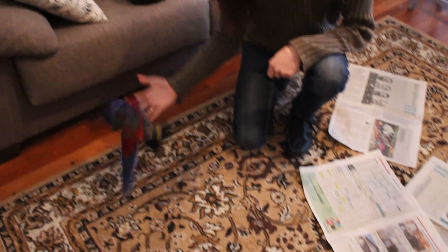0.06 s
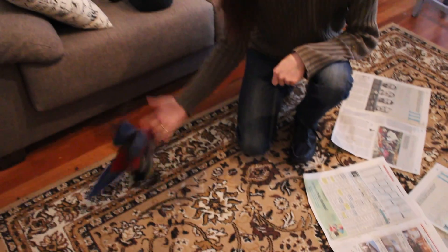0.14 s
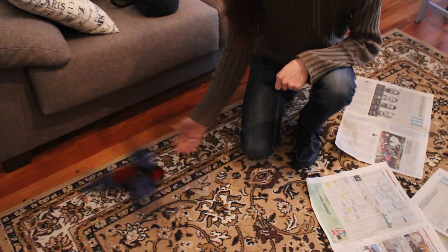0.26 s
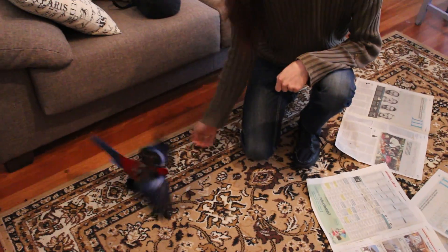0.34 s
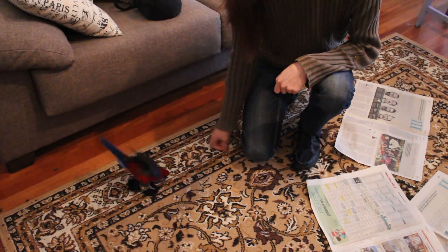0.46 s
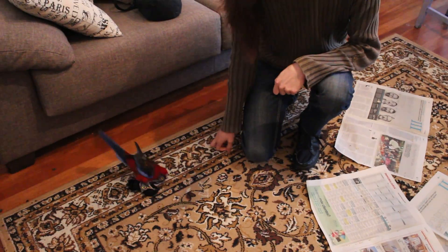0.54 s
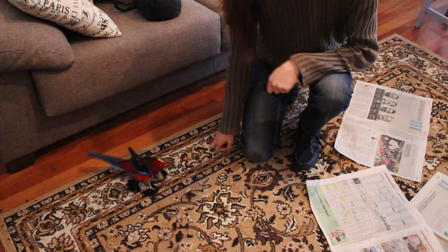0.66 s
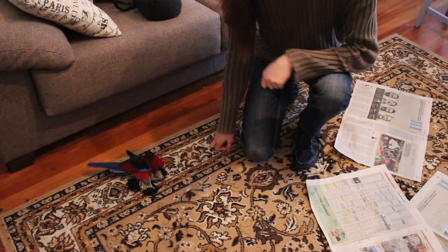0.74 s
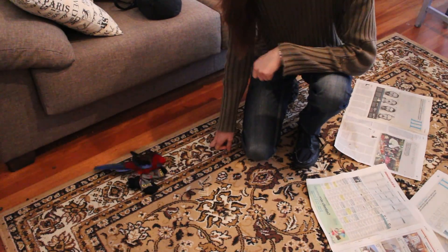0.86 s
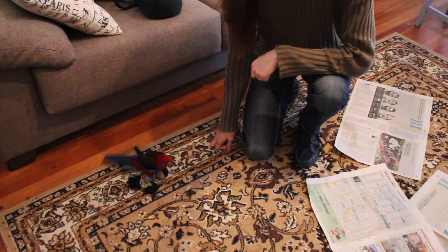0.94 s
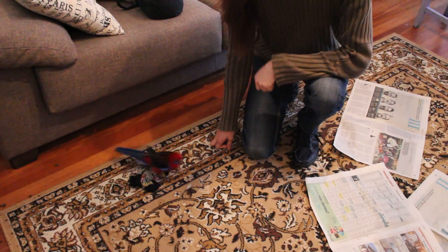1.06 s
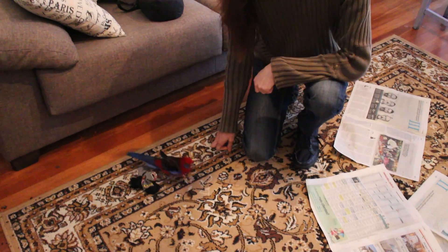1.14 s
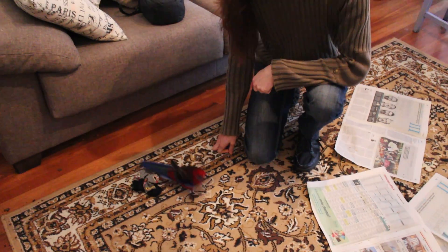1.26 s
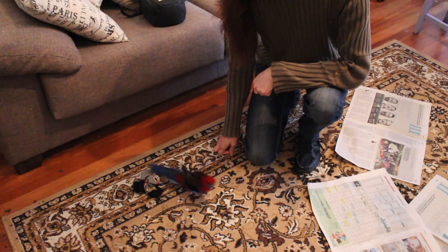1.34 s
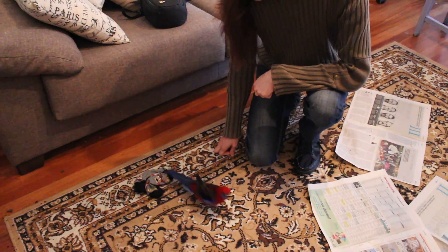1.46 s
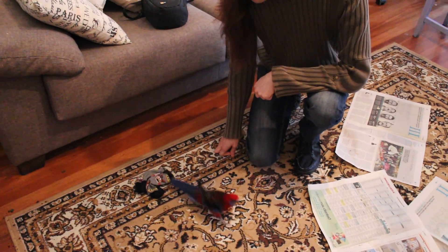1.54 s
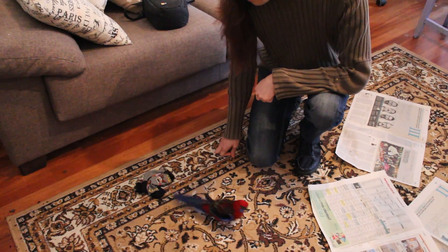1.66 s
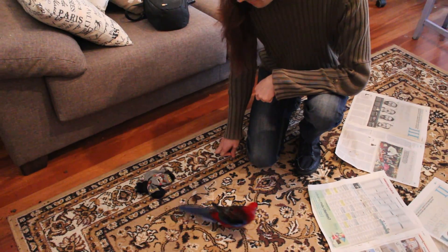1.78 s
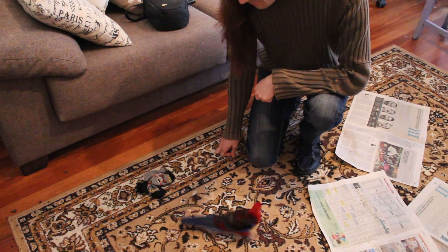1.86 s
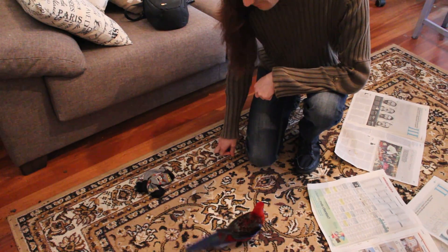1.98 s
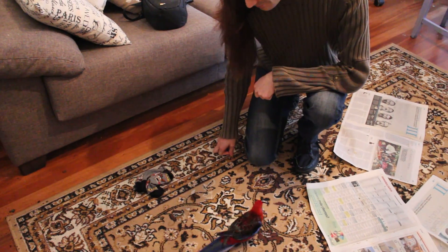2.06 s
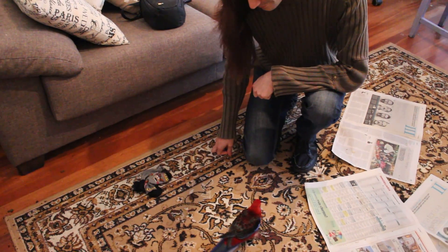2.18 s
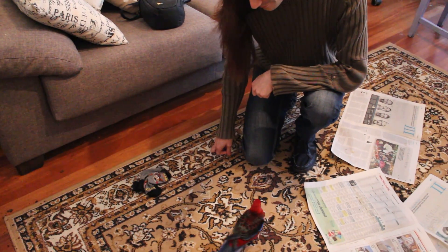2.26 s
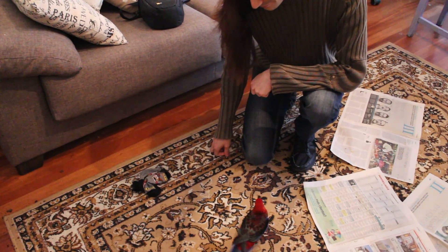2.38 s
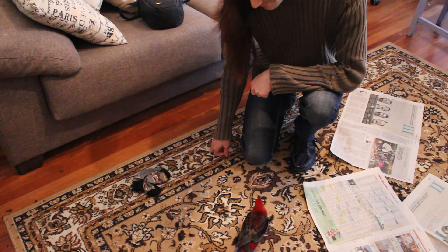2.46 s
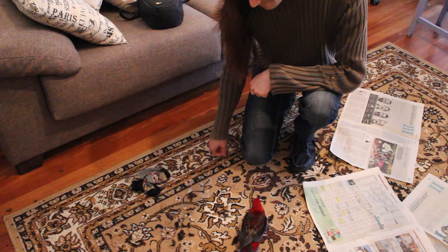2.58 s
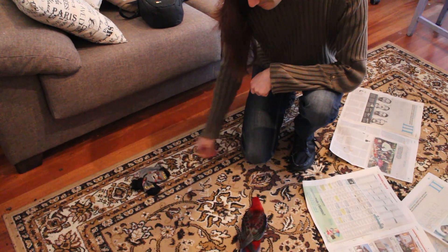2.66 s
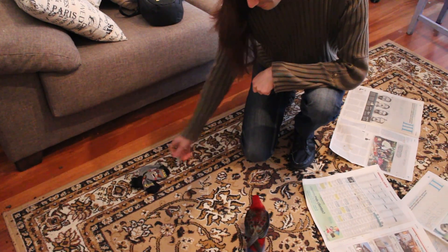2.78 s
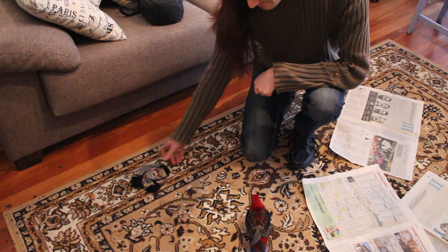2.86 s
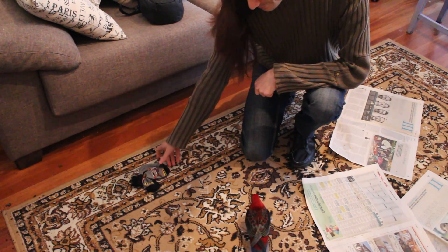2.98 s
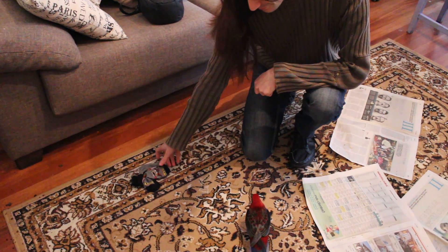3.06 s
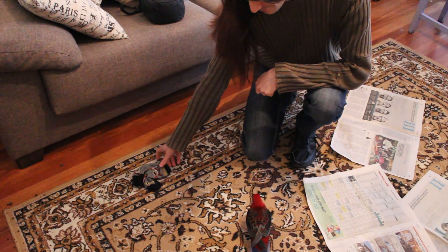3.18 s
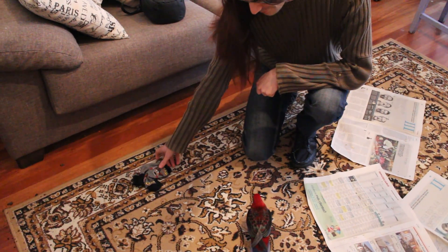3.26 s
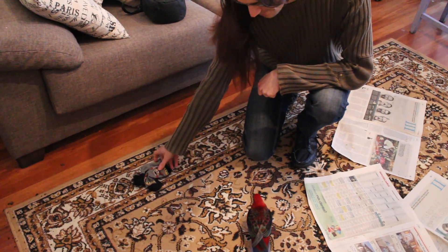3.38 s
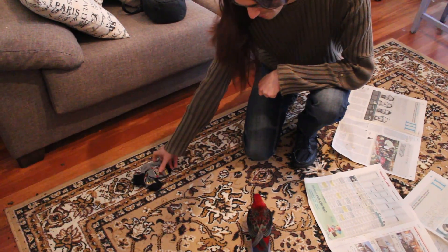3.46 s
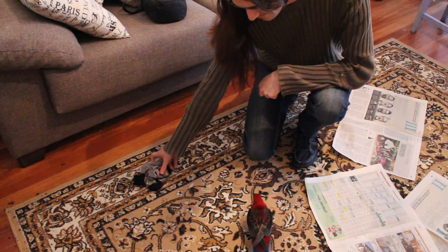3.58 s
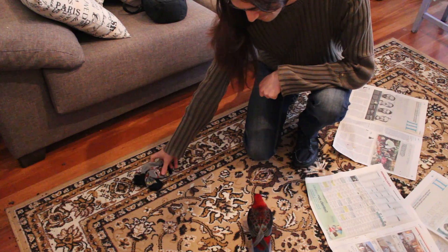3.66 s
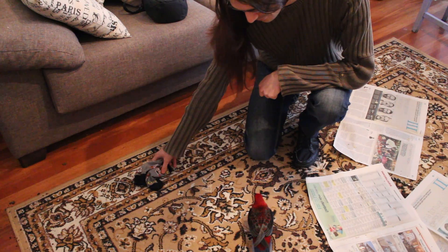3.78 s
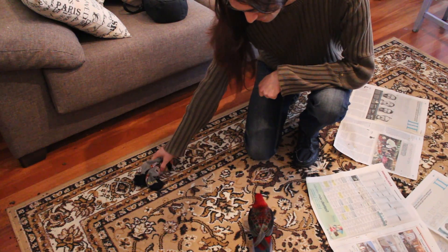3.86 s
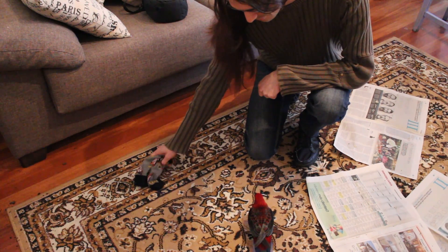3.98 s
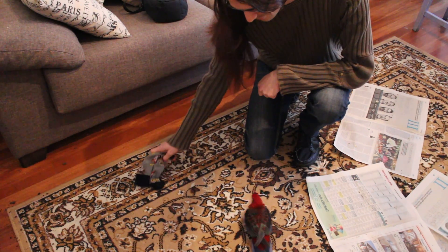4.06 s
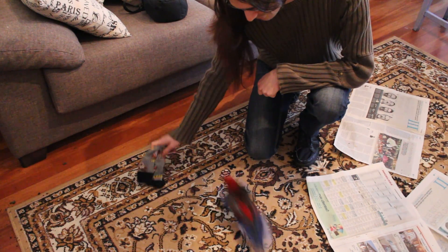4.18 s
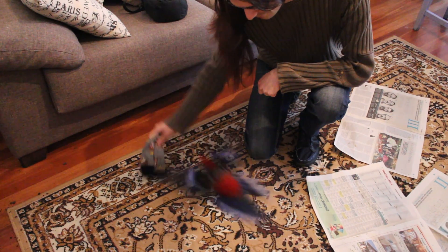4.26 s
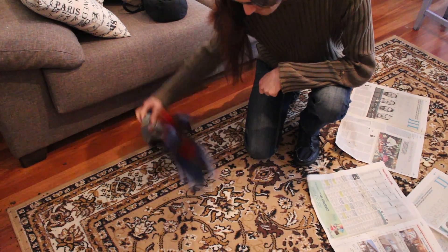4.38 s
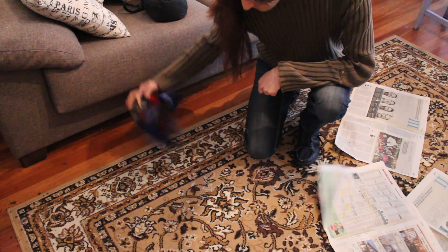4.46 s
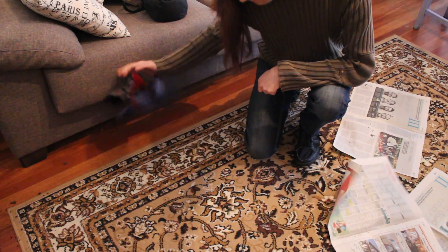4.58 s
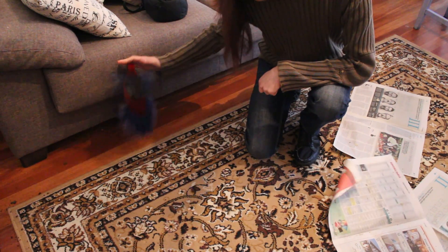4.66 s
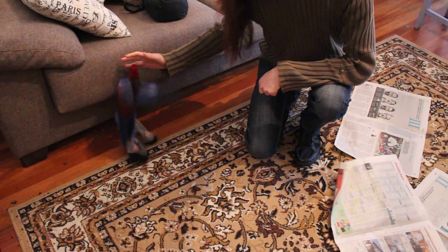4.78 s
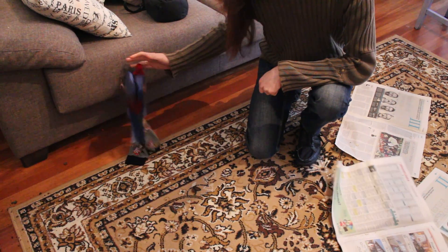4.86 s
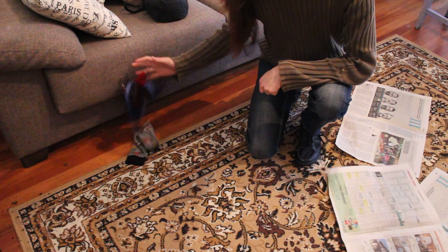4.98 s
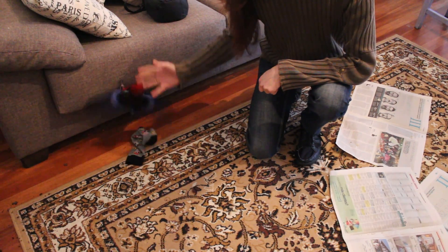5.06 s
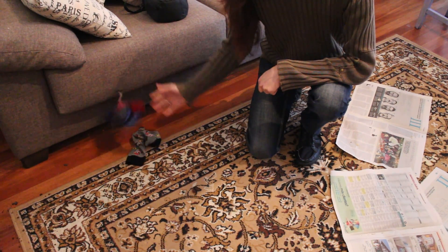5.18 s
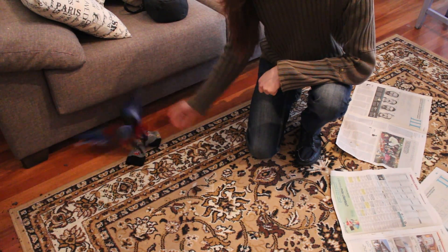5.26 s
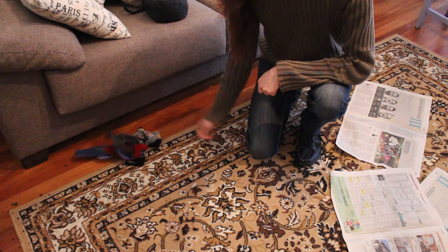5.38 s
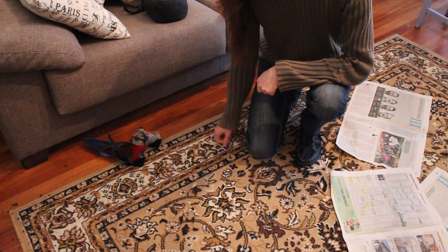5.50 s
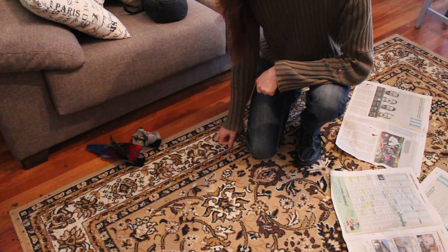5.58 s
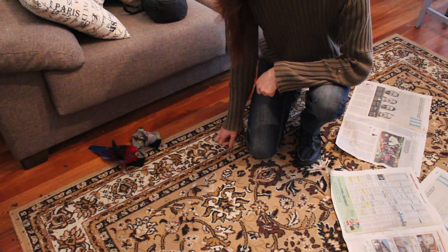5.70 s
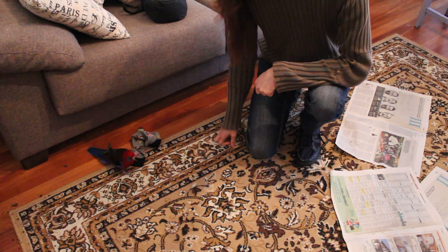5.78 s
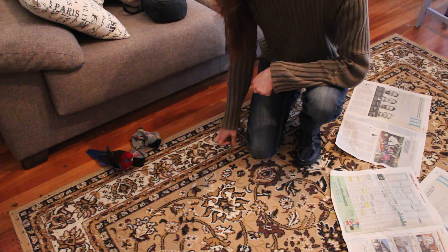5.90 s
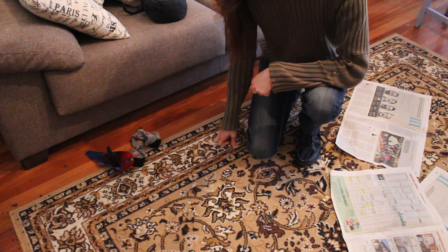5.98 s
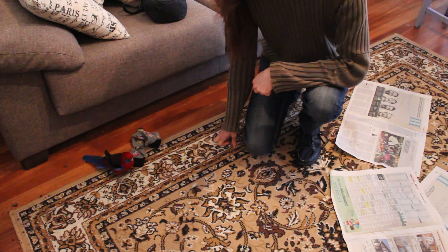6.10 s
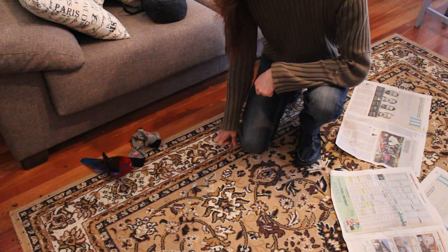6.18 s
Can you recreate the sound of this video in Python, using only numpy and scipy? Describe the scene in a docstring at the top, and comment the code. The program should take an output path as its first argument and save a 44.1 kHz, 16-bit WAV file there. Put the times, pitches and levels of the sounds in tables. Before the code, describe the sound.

A small parrot on a rug in a lively wood-floored room. A soft wing flurry and bumps open, then three very short, falling chirps about a second apart, each trailed by faint rasp. After a pause, wings burst and a loud, shrill, surging screech rings through the room. Claw ticks, sleeve scrapes and another flutter lead to two brighter chirps. Stereo microphone a short distance away, low dull hush behind.

```python
"""A wing flurry over a low hush comes first, then a parrot on a living-room rug guards a small object.
Main source: five sharp falling chirps, summed partials in throat resonances, each trailed by a noise rasp;
one shrill screech as it flies at a hand, a surging sine with overtones.
Wings are grainy noise with puffs; claw ticks, sleeve scrapes and soft floor bumps are resonated noise.
Discrete reflections and a decaying tail make a lively room; filtered noise makes the hush."""
import sys
import numpy as np
from scipy import signal
from scipy.fft import rfft, irfft, next_fast_len
from scipy.io import wavfile

SR = 44100
rng = np.random.default_rng(int(sys.argv[2]) if len(sys.argv) > 2 else 0)


def wav_out(sig):
    """Save sig, one row per channel (or a flat mono array), as 16-bit PCM at SR to the path in sys.argv[1]."""
    wavfile.write(sys.argv[1], SR, np.round(np.clip(np.atleast_2d(sig).T, -1, 1) * 32767).astype(np.int16))


N = 274937
TIME_S = np.arange(N) / SR
TOP_HZ = 15750
LN_60_DB = np.log(1000)

# Source levels are ahead of the mix gains in scene(); spectra are relative.
# chirps: (time [s], length [s], starting pitch [Hz], depth of fall [0-1], level [dB],
#          brightness [dB/octave], closing croak [dB], after-rasp level [dB])
CHIRPS = [(1.131, 0.05, 1780, 0.94, -29, 0, -6.5, -43.5), (2.214, 0.045, 1780, 0.98, -31.5, -2, -5, -50),
          (3.168, .046, 1750, 0.96, -33.5, -3.5, -4.5, -47.5), (5.193, .044, 1790, .7, -28.5, -1, -8, -45),
          (5.574, .047, 1830, .85, -33, 1, 6.5, -45.5)]
# throat and beak resonances: (frequency [Hz], level [dB])
THROAT_SPECTRUM = [(500, -3), (1000, -4.5), (1500, -1), (1850, -2.5), (2400, -9), (3400, -8.5),
                   (4200, -9.5), (4800, -4), (6500, -24), (8300, -21), (10000, -29.5), (11500, -22),
                   (15000, -54)]
# breathy rasp trailing a chirp: (frequency [Hz], level [dB])
RASP_SPECTRUM = [(250, 0), (600, 4), (1500, -3), (2500, -7), (4200, -18), (5700, -7.5), (7500, -24),
                 (11500, -26.5), (16000, -38)]
# chirp pitch: steady slide, then drop at the break (shares of starting pitch, ahead of the fall exponent)
CHIRP_SLIDE, CHIRP_DROP = .28, .4
# end of attack, centre and width of the break (shares of chirp length)
CHIRP_ATTACK, CHIRP_BREAK, BREAK_WIDTH = 0.16, .78, 0.0694

# screech overtones, level drifting steadily: (multiple of pitch [1], starting level [dB], rise [dB/s])
OVERTONES = [(2, -61, 11.5), (3, -53.5, 27), (4, -54.5, -12.5), (5, -69, 7.5), (6, -71, 0)]
# screech surges: (time [s], length [s], level [dB], left minus right [dB])
SURGES = [(4.489, 0.024, -17.5, 7), (4.508, 0.028, -18.5, 4.5), (4.569, 0.041, -17.5, 5),
          (4.618, 0.03, -21.5, -1), (4.666, 0.16, -24, 14.5)]
SURGE_ATTACK_S, SURGE_RELEASE_S = .012, 0.014
# held note under the surges; pitch starts flat and settles upward
SCREECH_START_S, SCREECH_LENGTH_S, SCREECH_DB = 4.456, 0.372, -33
SCREECH_HZ, SCREECH_FLAT_HZ, SETTLE_S = 2457, 90.1, .1
# room ringing at the whistle's pitch: gain, decay, left minus right
RING_DB, RING_T60_S, RING_PAN_DB = -6.5, 0.49, -6.5

# flapping: (time [s], run-up time constant [s], length [s], rustle level [dB], treble re rustle [dB],
#            air per beat [dB], swish per beat [dB])
FLURRIES = [(0, .02, 0.34, -51.5, -5, -51.5, -56.5), (4.404, 0.082, 0.42, -44.5, -4, -43.5, -63.5),
            (5.058, 0.028, 0.27, -44.5, -8, -50.5, -62)]
# hard wing slaps on rug and sleeve: (time [s], length [s], air level [dB], swish level [dB])
SLAPS = [(.36, 0.055, -49.5, -55.5), (4.413, 0.037, -35.5, -39), (4.744, 0.051, -32.5, -35)]
WINGBEAT_HZ, WINGBEAT_S, RUSTLE_RELEASE_S = 14.42, 0.054, 0.11
# soft feather rustle: (frequency [Hz], level [dB])
FEATHER_SPECTRUM = [(60, -6), (150, -1), (350, -0.5), (900, -2), (1700, -2), (3000, -8), (5000, -17),
                    (9000, -31)]
# crisp quill noise: (frequency [Hz], level [dB])
QUILL_SPECTRUM = [(1500, 2), (3500, 1.5), (6000, -0.5), (10000, -6), (13000, -15.5), (15500, -32.5)]
# air pushed by the wings: (frequency [Hz], level [dB])
AIR_SPECTRUM = [(25, -2), (70, -5.5), (130, 0), (200, 0), (450, -1.5), (1000, -6), (2000, -10.5),
                (5000, -33.5)]

# ticks of claws, beak and quills: (time [s], level [dB], centre [Hz])
TICKS = [(.28, -51, 8200), (.288, -45.5, 7500), (4.414, -35, 3980), (5.022, -40, 1494), (5.045, -33.5, 950),
         (5.073, -37, 1094), (5.112, -26.5, 1300), (5.173, -25, 1640)]
# bumps and scuffs on rug-covered boards: (time [s], length [s], level [dB], centre [Hz])
BUMPS = [(.145, 0.2, -51.5, 360), (.17, 0.16, -55.5, 45.4), (1.28, 0.06, -49.5, 355),
         (2.665, 0.093, -51.5, 299.6), (4.372, .04, -43.5, 453), (5.29, 0.074, -45, 498),
         (5.35, 0.11, -46, 248), (5.68, 0.081, -48, 600), (5.98, 0.056, -47.5, 310)]
# feathers scraping the sleeve: (time [s], length [s], level [dB], centre [Hz])
SCRAPES = [(0, 0.051, -45.5, 2380), (.36, 0.059, -58, 9000), (4.16, 0.4, -64.5, 5470),
           (4.525, 0.1, -48, 3660), (5.11, 0.1, -46, 855), (5.225, 0.058, -42, 1070)]

# echoes off floor and nearest walls: (delay [s], level [dB], left minus right [dB])
REFLECTIONS = [(.0045, -24.5, 3), (.0115, -5.5, -6.5), (0.023, -21, -0.5), (.036, -8, -3), (.058, -11, 1.5)]
# reverberation: (frequency [Hz], t60 [s])
ROOM_T60 = [(150, 0.56), (600, 0.46), (2000, 0.48), (5000, 0.5), (14000, 0.13)]
# spread of diffuse sound: (frequency [Hz], side minus mid [dB], right minus left [dB])
STEREO = [(40, -19.5, 4.5), (248, -7, 4.5), (1000, -6, 3.5), (2500, -1, 1), (5000, -0.5, 0.5),
          (10000, 0.5, 0)]

# room tone: (frequency [Hz], density [dB per Hz])
FLOOR_SPECTRUM = [(20, -13.5), (40, 5), (62, -5), (100, -6.5), (160, 1), (300, -4.5), (400, -8.5),
                  (900, -13.5), (2000, -18.5), (5500, -22), (10000, -27), (15700, -33.5)]
FLOOR_DB = -55.5
# hush, sinking and returning: (time [s], level [dB])
HUSH_LEVEL = [(0, -49.5), (1.6, -47.5), (3.4, -55), (3.9, -60), (5.4, -59), (6.23, -53)]
# hush colour: (frequency [Hz], level [dB])
HUSH_SPECTRUM = [(80, -23), (140, -12), (183, 0.5), (235, -3), (305, 5.5), (400, -7), (600, -8), (900, -9),
                 (1200, -8), (1800, -13), (2800, -25), (8000, -43)]


def undb(db):
    """Decibels to gain."""
    return 10 ** (np.asarray(db) / 20)


def unit(x):
    """Scale to rms 1."""
    return x / np.sqrt(np.mean(x ** 2) + 1e-18)


def at_hz(table, hz, axis=1):
    """Read a spectrum column on a log-frequency axis."""
    columns = np.transpose(table)
    return np.interp(np.log(np.maximum(hz, 1)), np.log(columns[0]), columns[axis])


def curve(table):
    """A (time, value) table at every sample."""
    return np.interp(TIME_S, *np.transpose(table))


def bins_hz(n):
    """Frequencies of an n-sample spectrum."""
    return np.arange(n // 2 + 1) * SR / n


def colour(x, table):
    """Filter by a (frequency, dB) spectrum, to rms 1."""
    length = x.shape[-1]
    n = next_fast_len(length)
    gains = undb(at_hz(table, bins_hz(n)))
    return unit(irfft(rfft(x, n) * gains, n)[..., :length])


def resonate(x, hz, q):
    """One resonance."""
    return signal.lfilter(*signal.iirpeak(min(hz, SR / 2.5), max(q, 1), fs=SR), x)


def walk(rate_hz, n=N):
    """Smooth random wandering of spread near 1."""
    place = np.arange(n) * rate_hz / SR
    return np.interp(place, np.arange(n), rng.standard_normal(n))


def spread(pair):
    """Diffuse stereo from two unrelated signals: alike in the bass, apart in the treble, leaning right."""
    length = pair.shape[-1]
    n = next_fast_len(length)
    mid, side = rfft(pair, n)
    side = side * undb(at_hz(STEREO, bins_hz(n)))
    lean = undb(at_hz(STEREO, bins_hz(n), axis=2) / 2)
    return irfft(np.array([(mid + side) / lean, (mid - side) * lean]), n)[:, :length]


def noise(table, grain_db=0):
    """Diffuse coloured noise; random gain swings make it crackle."""
    grains = rng.standard_normal((2, N)) * undb(grain_db * walk(1500))
    return colour(spread(grains), table)


def panned(x, pan_db):
    """Left-right level difference."""
    return np.array([x * undb(pan_db / 2), x * undb(-pan_db / 2)])


def swell(start_s, length_s):
    """Quick rise, slower fall; peak 1 after a third of the length."""
    age = np.clip((TIME_S - start_s) * 3 / length_s, 0, 30)
    return age * np.exp(1 - age)


def held(start_s, length_s, attack_s, release_s):
    """Envelope that rises, holds at 1 and falls within its length."""
    rise = (TIME_S - start_s) / attack_s
    fall = (start_s + length_s - TIME_S) / release_s
    return np.sin(np.pi / 2 * np.clip(np.minimum(rise, fall), 0, 1))


def add(track, start_s, x):
    """Mix a short sound in."""
    i = max(0, int(start_s * SR))
    track[i:i + len(x)] += x[:N - i]


def chirps(jitter=0.021, croak_jitter=0.122, breath_db=-14, shimmer_db=4.0, opening_db=8,
           onset_db=-15, sag_db=-4.0, late_db=-7, late_share=.36):
    """A rich tone slides down through the throat resonances and collapses into a rough croak."""
    out = np.zeros(N)
    for start_s, length_s, pitch_hz, fall, db, bright_db, croak_db, _ in CHIRPS:
        n = int(length_s * SR)
        u = np.linspace(0, 1, n)  # share of the chirp elapsed
        collapse = (1 + np.tanh((u - CHIRP_BREAK) / BREAK_WIDTH / 2)) / 2
        glide = np.maximum(1 - CHIRP_SLIDE * u - CHIRP_DROP * collapse, .1) ** fall
        hz = pitch_hz * glide * (1 + (jitter + croak_jitter * collapse) * walk(1400, n))
        partials_hz = np.arange(1, 17)[:, None] * hz
        # upper partials come in as the beak opens
        octave_db = bright_db - opening_db * np.exp(-u / 0.084)
        tilt_db = octave_db * np.log2(partials_hz / pitch_hz)
        shimmer = np.array([walk(387, n) for _ in partials_hz])
        gains = undb(at_hz(THROAT_SPECTRUM, partials_hz) + tilt_db + shimmer_db * shimmer)
        gains = gains * (partials_hz < TOP_HZ)
        # the fundamental starts weak and ramps in
        gains[0] = gains[0] * undb(late_db * np.maximum(1 - u / late_share, 0))
        phases = 2 * np.pi * np.cumsum(partials_hz, axis=1) / SR
        tone = np.sum(gains * np.sin(phases), axis=0)
        tone = tone * np.sqrt(2 * np.abs(hz) / pitch_hz)  # weaker as pitch falls
        breath = undb(breath_db) * u * colour(rng.standard_normal(n), THROAT_SPECTRUM)
        effort_db = onset_db * np.maximum(1 - u / CHIRP_ATTACK, 0) + sag_db * u + croak_db * collapse
        voice = (tone + breath) * undb(db + effort_db)
        add(out, start_s, voice * signal.windows.tukey(n, .1))
    return out


def rasps(delay_s=0.11, length_s=0.077):
    """Faint grainy noise from the bird swells after each chirp."""
    envelope = sum(undb(row[-1]) * swell(row[0] + delay_s, length_s) for row in CHIRPS)
    return noise(RASP_SPECTRUM, grain_db=3.5) * envelope


def screech(jitter=0.0037, onset_jitter=0.022, lock_s=0.025, rough=0.84, flutter_db=4.5, flutter_rad=.5):
    """A whistle starts rough, locks on pitch and surges; returned with its fluttering overtones."""
    age_s = np.clip(TIME_S - SCREECH_START_S, 0, SCREECH_LENGTH_S)
    unsettled = np.exp(-(age_s / lock_s) ** 2)
    hz = SCREECH_HZ - SCREECH_FLAT_HZ * np.exp(-age_s / SETTLE_S)
    hz = hz * (1 + (jitter + onset_jitter * unsettled) * walk(900))
    phase = 2 * np.pi * np.cumsum(hz) / SR
    note = held(SCREECH_START_S, SCREECH_LENGTH_S, attack_s=0.0024, release_s=.04)
    effort = undb(SCREECH_DB) * note * (1 + rough * unsettled * walk(600))
    for start_s, length_s, db, pan_db in SURGES:
        surge = undb(db) * held(start_s, length_s, SURGE_ATTACK_S, SURGE_RELEASE_S)
        effort = effort + panned(surge, pan_db)
    # smearing the envelope leaves the pitch ringing
    keep = np.exp(-LN_60_DB / RING_T60_S / SR)
    ring = undb(RING_DB) * signal.lfilter([1 - keep], [1, -keep], effort.mean(axis=0))
    whistle = (effort + panned(ring, RING_PAN_DB)) * np.sin(phase)
    overtones = np.zeros(N)
    for multiple, db, rise_db_per_s in OVERTONES:
        gain = undb(db + rise_db_per_s * age_s + flutter_db * walk(150))
        overtones += note * gain * np.sin(round(multiple) * phase + flutter_rad * walk(230))
    return np.sqrt(2) * whistle, np.sqrt(2) * overtones


def wings(flutter_db=2.0, beat_scatter_db=-2.0):
    """Feathers rub in a grainy rustle; every beat and slap pushes a puff of air and swishes."""
    soft = noise(FEATHER_SPECTRUM, grain_db=-0.5)
    crisp = noise(QUILL_SPECTRUM, grain_db=-1.5)
    air = noise(AIR_SPECTRUM, grain_db=2)
    out, strokes, flutter = 0, list(SLAPS), undb(flutter_db * walk(60))
    for start_s, run_up_s, length_s, db, treble_db, air_db, swish_db in FLURRIES:
        before = np.maximum(start_s - TIME_S, 0) / run_up_s
        after = np.maximum(TIME_S - start_s - length_s, 0) / RUSTLE_RELEASE_S
        contact = np.exp(-before - after)
        out = out + undb(db) * contact * flutter * (soft + undb(treble_db) * crisp)
        beats_s = np.arange(start_s, start_s + length_s, 1 / WINGBEAT_HZ)
        for beat_s, chance in zip(beats_s, rng.standard_normal(size=12)):
            scatter_db = beat_scatter_db * chance
            strokes.append((beat_s, WINGBEAT_S, air_db + scatter_db, swish_db + scatter_db))
    puffs, swishes = sum(undb([[air_db], [swish_db]]) * swell(start_s, length_s)
                         for start_s, length_s, air_db, swish_db in strokes)
    return out + puffs * air + swishes * crisp


def ticks(decay_s=0.0031, q=3.3):
    """Tiny hard contacts: resonated noise that dies at once."""
    out, age_s = np.zeros(N), TIME_S[:SR // 40]
    for start_s, db, hz in TICKS:
        tick = unit(resonate(rng.standard_normal(len(age_s)), hz, q))
        add(out, start_s, undb(db) * tick * np.exp(-age_s / decay_s))
    return out


def rubs(table, q):
    """Soft contacts: each a brief swell of friction noise in two stacked resonances."""
    out, n = np.zeros(N), SR // 2
    for start_s, length_s, db, hz in table:
        age = 3 * TIME_S[:n] / length_s
        friction = rng.standard_normal(n) * age * np.exp(-age)
        rub = resonate(resonate(friction, hz, q), hz, q / 2)
        # rms over the length, not the whole buffer
        add(out, start_s, undb(db) * unit(rub) * np.sqrt(length_s * SR / n))
    return out


def reflections(x):
    """Distinct echoes from nearby surfaces: delayed, panned copies."""
    return sum(panned(undb(db) * np.interp(TIME_S - delay_s, TIME_S, x, left=0), pan_db)
               for delay_s, db, pan_db in REFLECTIONS)


def room(x, gap_s=0.004, build_s=0.0097, sparse_db=5):
    """Scattered echoes thicken into a tail, decaying per octave band, fastest at the top."""
    age_s = TIME_S[:SR * 3 // 4]
    n = len(age_s)
    scatter_db = sparse_db * np.exp(-age_s / 0.038) * (rng.standard_normal(n) - 0.5)
    spectrum = rfft(spread(rng.standard_normal((2, n)) * undb(scatter_db)))
    octave = np.log2(np.clip(bins_hz(n), 125, 16000) / 125)
    response = 0
    for k in range(8):
        band = irfft(spectrum * np.maximum(1 - np.abs(octave - k), 0), n)
        response = response + band * np.exp(-LN_60_DB * age_s / at_hz(ROOM_T60, 125 * 2 ** k))
    response = response * np.clip((age_s - gap_s) / build_s, 0, 1)
    return signal.fftconvolve(x, unit(response) / np.sqrt(n), axes=1)[:, :N]


def background(waver_db=1.4):
    """Steady room-tone noise under a wavering dull hush."""
    hush_db = curve(HUSH_LEVEL) + waver_db * walk(20)
    return noise(FLOOR_SPECTRUM) * undb(FLOOR_DB) + noise(HUSH_SPECTRUM) * undb(hush_db)


def scene():
    """Bird, wings and small contacts, direct and through the room, over the background."""
    calls, flapping = chirps(), wings()
    whistle, overtones = screech()
    contacts = ticks() + rubs(BUMPS, q=2.2) + rubs(SCRAPES, q=1.7)
    direct = panned(calls, pan_db=-3.5) * undb(-3.5) + rasps() + whistle + flapping
    direct = direct + panned(overtones, pan_db=-2.0) + panned(contacts, pan_db=-4.5)
    sent = undb(-4.0) * calls + undb(-15.5) * whistle + undb(-6) * overtones
    sent = sent + undb(-7.5) * contacts + undb(-10) * flapping
    return direct + reflections(sent.mean(axis=0)) + room(sent) + background()


def record(dry):
    """A steep elliptic low-pass cuts the top."""
    return signal.sosfilt(signal.ellip(10, .2, 70, TOP_HZ, fs=SR, output="sos"), dry)


dry = scene()
out = record(dry)
wav_out(out)
```